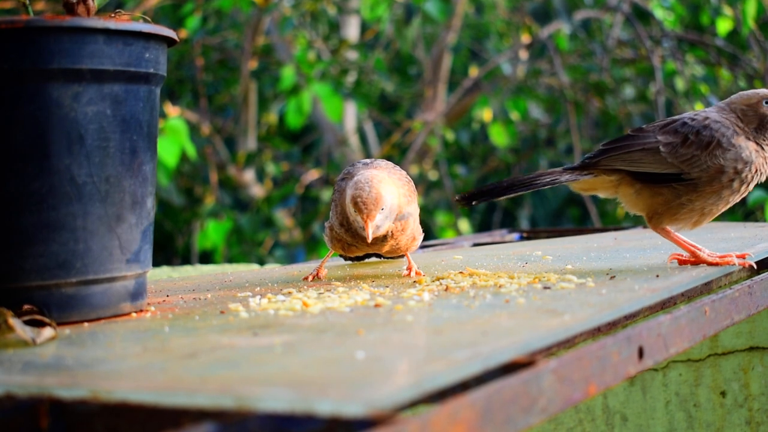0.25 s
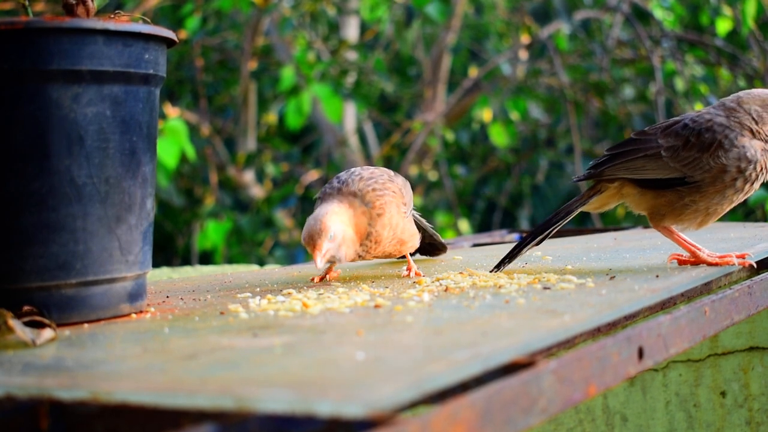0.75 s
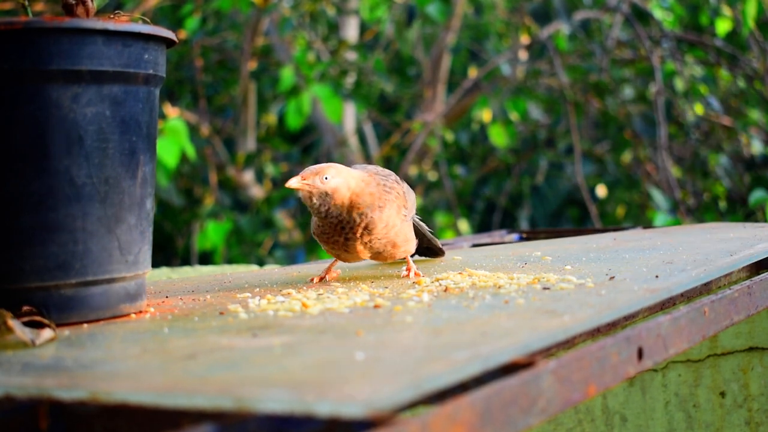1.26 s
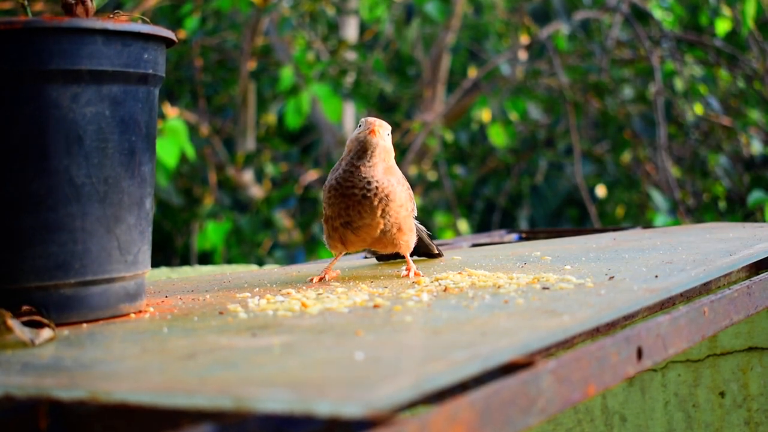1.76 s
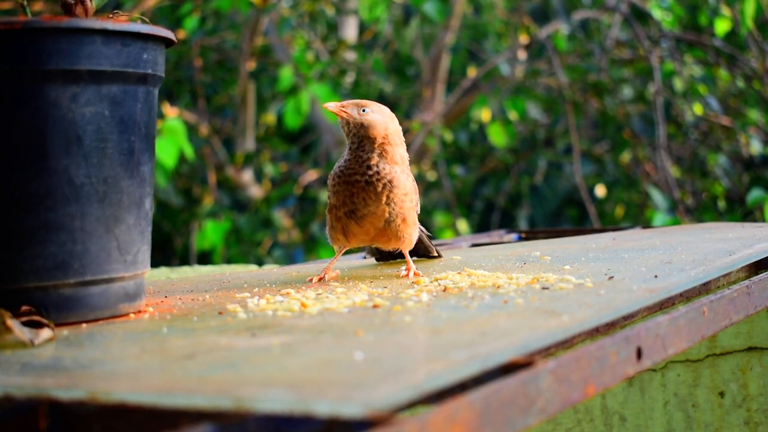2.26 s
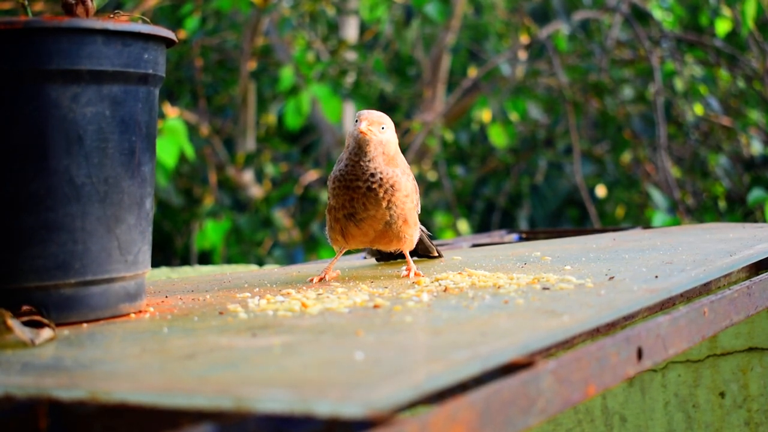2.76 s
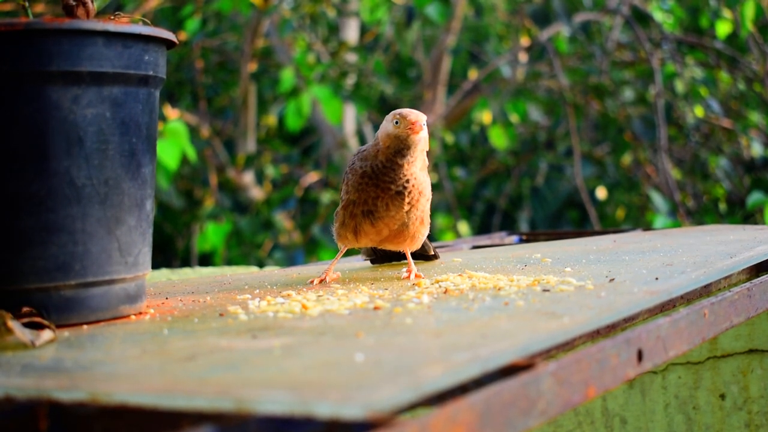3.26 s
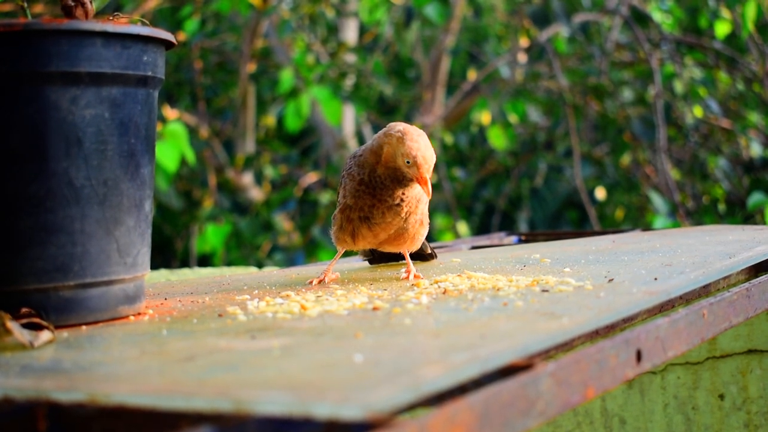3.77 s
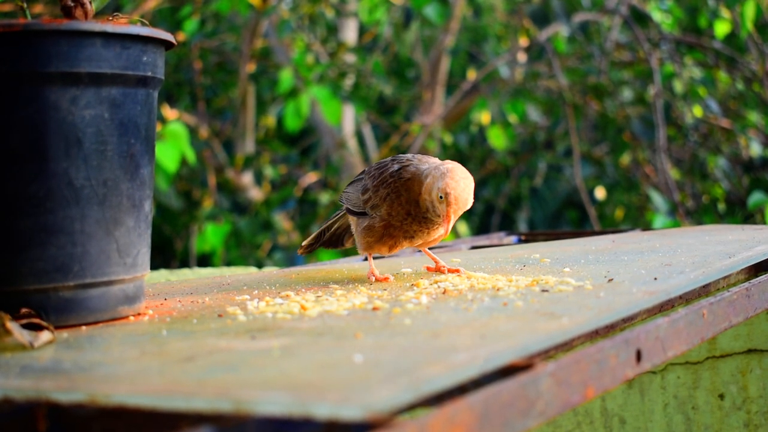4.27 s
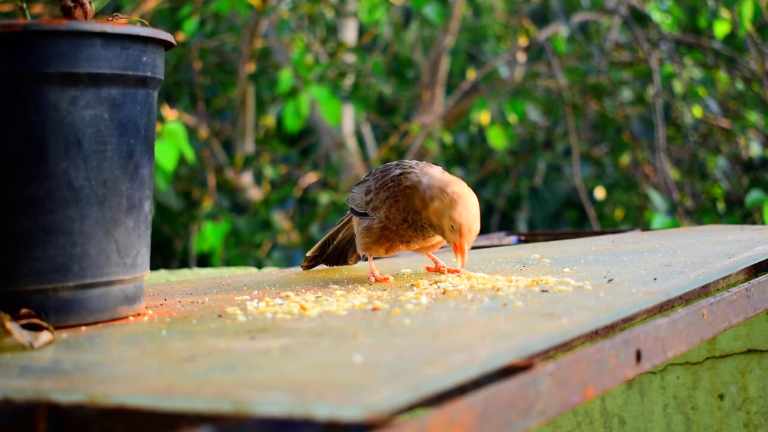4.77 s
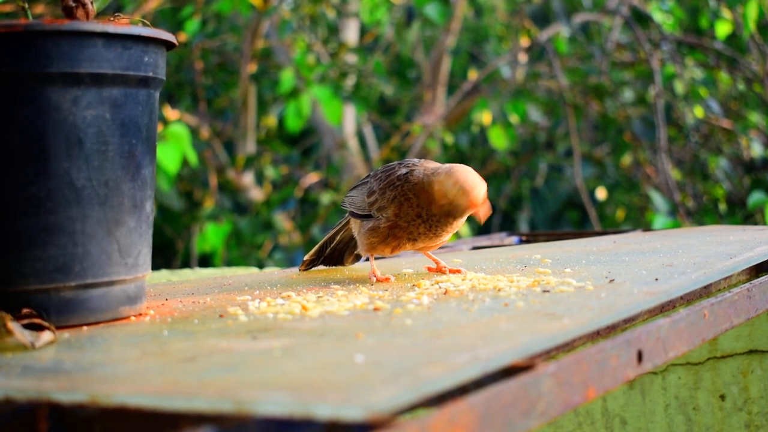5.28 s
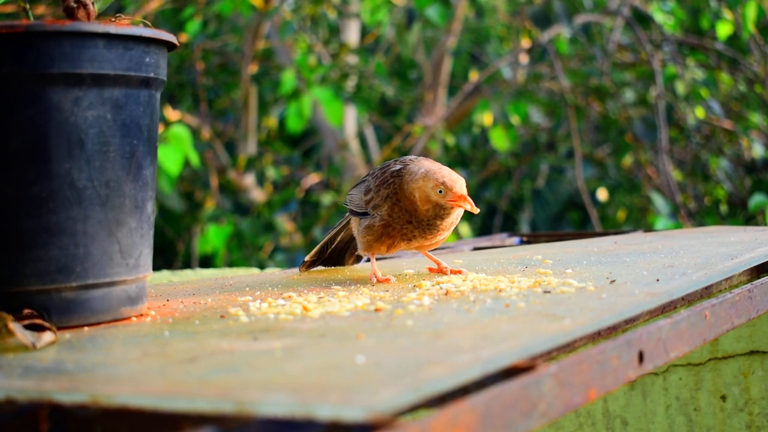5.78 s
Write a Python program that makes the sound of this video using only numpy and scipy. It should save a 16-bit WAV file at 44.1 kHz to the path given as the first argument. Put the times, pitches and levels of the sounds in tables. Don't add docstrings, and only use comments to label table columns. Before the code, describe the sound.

A small bird flock chatters in quick squeaky falling whistles among garden trees, over faint traffic, soft broom scrapes, thin insect hiss and beak ticks.

```python
import sys
import numpy as np
from scipy import signal
from scipy.fft import rfft, irfft
from scipy.io import wavfile

SR = 44100
rng = np.random.default_rng(int(sys.argv[2]) if len(sys.argv) > 2 else 0)


def boost(x):
    u = np.asarray(x, float) / 20
    return 10 ** u


def transcribe(signal):
    frames = np.atleast_2d(signal).T
    limited = np.clip(frames, -1, 1)
    pcm = np.round(limited * 32767).astype(np.int16)
    wavfile.write(sys.argv[1], SR, pcm)


N = 265903


def resonance(x, hz, width_hz):
    r = np.exp(-np.pi * width_hz / SR)
    feedback = [1, -2 * r * np.cos(2 * np.pi * hz / SR), r * r]
    return signal.lfilter([(1 - r * r) / 2, 0, (r * r - 1) / 2], feedback, x)


def butterworth(x, order, hz, kind="low"):
    return signal.sosfilt(signal.butter(order, hz, kind, fs=SR, output="sos"), x)


def drift(rate_hz):
    r = np.exp(-2 * np.pi * rate_hz / SR)
    slow = signal.lfilter([1], [1, -2 * r, r * r], rng.standard_normal(N + SR))[SR:]
    return slow / slow.std()


def add(track, start_s, sound):
    at = round(start_s * SR)
    track[at:at + len(sound)] += sound[:N - at]


def swells(events, attack_s, fade_db_per_s, floor_db):
    t = np.arange(N) / SR
    power = boost(floor_db) ** 2
    for start_s, length_s, level_db in events:
        rise = np.clip((t - start_s) / attack_s, 0, 1)
        fading_s = np.maximum(t - start_s - attack_s - length_s, 0)
        power = power + (rise * boost(level_db - fade_db_per_s * fading_s)) ** 2
    return np.sqrt(power)


def garden(x, scatter_db, direct_db=-8):
    t = np.arange(SR) / SR
    near_t60_s, far_t60_s, far_db = 0.55, 1.0, -18
    decay = boost(-60 * t / near_t60_s) + boost(far_db - 60 * t / far_t60_s)
    clumps = boost(2.5 * drift(110)[:SR])
    onset = np.minimum(t / 0.0028, 1)
    scatter = rng.standard_normal(SR) * onset * decay * clumps
    scatter = signal.lfilter([1], [1, -0.25], scatter)
    scatter /= np.sqrt(np.sum(scatter ** 2))
    return boost(direct_db) * x + boost(scatter_db) * signal.fftconvolve(x, scatter)[:N]


def whistle(pitch_hz, level_db, voice, bright_db):
    phase = 2 * np.pi * np.cumsum(pitch_hz) / SR
    sound = 0
    for multiple, db in voice:
        gain = boost(level_db + db + bright_db * np.log2(multiple))
        sound = sound + gain * np.sin(multiple * phase)
    return sound


def settle(notes, rest_hz, spread_hz):
    misses_hz = spread_hz * rng.standard_normal(30)
    return [(start_s, length_s, start_hz, rest_hz + miss_hz, level_db)
            for (start_s, length_s, start_hz, level_db), miss_hz in zip(notes, misses_hz)]


def chatter(notes, voice, bright, fall_shape, rise_shape=0.47, swell=0.63, hold=0, grow_db=0):
    out = np.zeros(N)
    unsteady = np.tile(1 + 0.005 * drift(70), 2)
    usual_bright_db, usual_level_db, loss_per_db = bright
    for start_s, length_s, start_hz, end_hz, level_db in notes:
        u = np.linspace(0, 1, int(length_s * SR))
        moved = np.minimum(u / (1 - hold), 1)
        shape = fall_shape if end_hz < start_hz else rise_shape
        glide = np.sin(np.pi / 2 * moved ** shape) ** 2
        pitch_hz = (start_hz + (end_hz - start_hz) * glide) * unsteady[int(start_s * SR):][:len(u)]
        breath = np.abs(np.sin(np.pi * u ** swell)) ** 0.6
        bright_db = usual_bright_db - loss_per_db * (level_db - usual_level_db)
        contour_db = level_db + 3 + grow_db * (u - 0.5)
        add(out, start_s, breath * whistle(pitch_hz, contour_db, voice, bright_db))
    return out * boost(2.2 * drift(200))


# (pitch_hz, level_db per Hz)
TRAFFIC_COLOUR = [(15, -58), (25, -51), (69, -13), (246, -4.5), (648, -2.5), (997, -5.5), (2630, -9.5),
                  (3730, -13.5), (5010, -17), (6210, -15), (7710, -17.5), (8820, -46), (10400, -28.5),
                  (15500, -41)]
# (start_s, length_s, level_db)
TRAFFIC_SURGES = [
    (.15, .05, -70),
    (.84, .05, -57),
    (1.15, .15, -51),
    (1.3, .03, -49.5),
    (2.02, 0.51, -53.5),
    (3.3, 0.028, -56.5),
    (4.52, .04, -61),
]


def traffic():
    hz = np.fft.rfftfreq(N, 1 / SR) + 1
    at_hz, db = np.transpose(TRAFFIC_COLOUR)
    colour = boost(np.interp(np.log(hz), np.log(at_hz), db))
    noise = irfft(rfft(rng.standard_normal(N)) * colour, N)
    low = butterworth(noise, 2, [170, 600], "band")
    steady = boost(-58.0) * (noise - low) / low.std()
    surge = swells(TRAFFIC_SURGES, attack_s=0.017, fade_db_per_s=42.5, floor_db=-54)
    return steady + surge * low / low.std()


# (pitch_hz, width_hz, level_db)
YARD_RING = [(658, 224, 3.5), (954, 290, 6.5), (1220, 1400, -4.5), (1500, 245, 0.5), (2000, 3800, -7.5)]
# (start_s, length_s, level_db)
BROOM_STROKES = [
    (.08, 0.036, -50.5),
    (.77, 0.37, -49),
    (1.1, 0.067, -49),
    (2.0, 0.3, -48),
    (3.26, 0.13, -47.5),
    (4.42, 0.38, -51),
]


def broom():
    scrape = np.zeros(N)
    for hz, width_hz, db in YARD_RING:
        patches = boost(db + 2.84 * drift(9.1))
        scrape += patches * resonance(rng.standard_normal(N), hz, width_hz)
    scrape = butterworth(scrape, 4, 2800)
    stroke = swells(BROOM_STROKES, attack_s=0.023, fade_db_per_s=31, floor_db=-57)
    return stroke * scrape / scrape.std()


def insects():
    pitch_hz, width_hz, level_db = 8700, 800, -62.5
    band = resonance(rng.standard_normal(N), pitch_hz, width_hz)
    band = resonance(band, pitch_hz, width_hz)
    return boost(level_db + 1.1 * drift(6.4)) * band / band.std()


# (start_s, length_s, pitch_hz, level_db)
HOOTS = [
    (2.026, 0.078, 950, -57),
    (2.365, 0.34, 1052, -50.5),
    (2.758, 0.15, 1050, -60),
    (3.265, 0.11, 980, -51.5),
    (3.398, 0.28, 939, -57),
    (3.775, .3, 944, -61),
]


def hoot():
    out = np.zeros(N)
    sag_hz_per_s = 38
    for start_s, length_s, hz, level_db in HOOTS:
        t = np.arange(0, length_s, 1 / SR)
        pitch_hz = hz - sag_hz_per_s * (t - length_s / 2)
        tone = whistle(pitch_hz, level_db - 0.5, [(1, 0)], bright_db=0)
        add(out, start_s, tone * signal.windows.tukey(len(t), 0.3))
    return garden(out, scatter_db=1.6)


# (start_s, peak_db, pitch_hz, width_hz, t60_s = time to die by 60 dB)
BOARD_TICKS = [(0.102, -34, 5400, 4000, 0.09), (.105, -38, 2320, 500, 0.062),
               (.145, -35, 4000, 4000, 0.039), (.148, -43, 2390, 500, .05), (.435, -34, 4540, 5000, 0.026),
               (.596, -47, 5030, 5000, .015), (.596, -32.5, 2160, 806, 0.013),
               (.762, -31, 8000, 3000, .015), (3.526, -40, 5600, 1500, 0.013),
               (4.048, -33.5, 2270, 1770, 0.2), (4.33, -37, 6040, 6060, 0.016),
               (4.855, -61, 9940, 2000, 0.018), (4.895, -37, 8500, 4000, 0.017)]


def ticks():
    out, t = np.zeros(N), np.arange(3000) / SR
    for start_s, peak_db, hz, width_hz, t60_s in BOARD_TICKS:
        knock = rng.standard_normal(3000) * boost(-60 * t / t60_s)
        burst = resonance(resonance(knock, hz, width_hz), hz, width_hz)
        add(out, start_s, boost(peak_db) * burst / np.abs(burst).max())
    out = butterworth(out, 3, 9500)
    return garden(out, scatter_db=-10, direct_db=-3.0)


# (multiple of the pitch, level_db)
CLEAR_VOICE = [(1, 5.5), (2, -11.5), (3, -31.5)]
# (start_s, length_s, start_hz, end_hz, level_db)
STRAY_CALLS = [
    (.197, 0.049, 3670, 3788, -43),
    (.40, 0.031, 4470, 4300, -63),
    (.9, 0.094, 4650, 4450, -38),
    (1.12, 0.143, 2870, 2770, -50),
    (3.712, .036, 3150, 2600, -55),
    (4.19, .03, 2030, 2100, -57),
    (4.22, .035, 2150, 2600, -54),
    (4.355, 0.15, 3580, 3240, -56.5),
    (4.98, .05, 1764, 1685, -57.5),
    (5.19, 0.045, 1520, 1504, -58),
]


def stray_calls():
    calls = chatter(STRAY_CALLS, CLEAR_VOICE, (-5, -51, 0.01), fall_shape=0.8, rise_shape=1.1)
    return garden(calls, scatter_db=-5, direct_db=-4)


# (multiple of the pitch, level_db)
HOARSE_THROAT = [(1, -1.5), (1.5, -7), (2, 1.5), (2.5, -12), (3, -16.5), (3.5, -26), (4, -26), (4.5, -55)]
# (start_s, length_s, start_hz, end_hz, level_db)
HOARSE_CALLS = [
    (.0, 0.033, 3187, 2920, -39.5),
    (.452, 0.085, 3022, 2893, -43),
    (.66, 0.13, 3104, 3090, -41),
    (2.903, 0.089, 2860, 2880, -50),
]


def low_bird_hoarse():
    calls = chatter(HOARSE_CALLS, HOARSE_THROAT, (0.45, -39.5, 0.58), fall_shape=0.93)
    return garden(calls, scatter_db=0.5)


# (start_s, length_s, start_hz, level_db)
FLAT_NOTES = [
    (1.14, 0.091, 3887, -37.5),
    (1.45, .07, 3944, -35),
    (1.725, 0.089, 3790, -38),
    (2.305, 0.1, 3830, -42.5),
    (2.57, 0.068, 3925, -35.5),
    (2.975, 0.029, 3840, -36),
    (3.275, 0.035, 3940, -35.5),
    (3.495, 0.075, 3907, -34),
    (3.825, 0.092, 3786, -38),
]


def flat_bird():
    notes = settle(FLAT_NOTES, rest_hz=3570, spread_hz=46)
    return garden(chatter(notes, CLEAR_VOICE, (4.5, -36, 0.01), fall_shape=4.3), scatter_db=-2.5)


# (time_s after its start, pitch_hz, level_db)
WARBLE_SHAPE = [
    (0, 4700, -28),
    (.006, 4350, -7),
    (.020, 2250, -11),
    (.027, 3100, 1),
    (.034, 2900, 1),
    (.044, 2620, -4),
    (.048, 1950, -14),
    (.053, 2750, -8),
    (.074, 2780, -20),
]
# (start_s, level_db)
WARBLE_STARTS = [
    (5.051, -20.5),
    (5.353, -19),
]
# (multiple of the pitch, level_db)
WARBLE_TONES = [(.7, -27), (1, -2)]
# (multiple of the pitch, level_db)
WARBLE_RASP = [(0.541, -3.5), (.8, -8), (1.22, -7), (1.45, -12)]


def warbler():
    out = np.zeros(N)
    time_s, hz, db = np.transpose(WARBLE_SHAPE)
    t = np.arange(0, time_s[-1], 1 / SR)
    pitch_hz, shape_db = np.interp(t, time_s, hz), np.interp(t, time_s, db)
    rasp_t60_s = 0.079
    voice = WARBLE_TONES + [(multiple, db - 60 * t / rasp_t60_s) for multiple, db in WARBLE_RASP]
    for start_s, level_db in WARBLE_STARTS:
        add(out, start_s, whistle(pitch_hz, level_db + shape_db, voice, bright_db=0))
    out = out * boost(2.5 * drift(400))
    return garden(out, scatter_db=-7, direct_db=0)


# (multiple of the pitch, level_db)
LOW_THROAT = [(1, -5.5), (2, 0), (3, -20.5), (4, -32.5)]
# (start_s, length_s, start_hz, level_db)
LOW_SERIES = [(1.11, 0.13, 3252, -34), (1.355, 0.12, 3210, -34), (1.58, .11, 3325, -31.5),
              (1.81, .11, 3268, -34), (2.04, 0.12, 3238, -36.5), (2.27, 0.13, 3250, -38),
              (2.51, 0.11, 3290, -36.5), (3.255, 0.092, 3270, -40.5), (5.285, 0.085, 3255, -41),
              (5.48, 0.13, 3120, -44.5), (5.66, 0.1, 3260, -39.5), (5.87, .12, 3218, -41.5)]
# (start_s,
# length_s, start_hz, end_hz, level_db)
LOW_SINGLES = [(0.599, 0.14, 3400, 3195, -40.5), (0.716, 0.085, 3187, 3266, -34.5),
               (.875, .15, 3218, 2920, -37), (1.137, 0.1, 3580, 3380, -64), (1.411, .089, 3240, 3390, -52),
               (2.245, 0.024, 3700, 3500, -56), (2.74, .13, 3243, 3034, -36.5),
               (2.943, .11, 3210, 3050, -34), (3.889, 0.055, 3265, 3377, -30.5),
               (4.788, 0.1184, 3026, 3155, -39.5), (5.02, 0.083, 2740, 3097, -40),
               (5.115, 0.036, 3293, 3268, -29)]


def low_bird():
    notes = settle(LOW_SERIES, rest_hz=2943, spread_hz=12) + LOW_SINGLES
    calls = chatter(notes, LOW_THROAT, (1.34, -41, 0.41), fall_shape=2.0, hold=0.1196, grow_db=-1.5)
    return garden(calls, scatter_db=1.43)


# (multiple of the pitch, level_db)
HIGH_THROAT = [(1, 0.5), (2, -17), (3, -37)]
# (start_s, length_s, start_hz, level_db)
HIGH_SERIES = [(.825, 0.11, 4640, -34.5), (1.035, 0.096, 4970, -33.5), (1.225, 0.064, 4620, -29),
               (1.39, 0.091, 4790, -31.5), (1.575, 0.041, 4850, -29.5), (1.745, 0.054, 4780, -30.5),
               (1.915, 0.074, 4830, -31.5), (2.08, .09, 4615, -31), (2.25, 0.063, 4696, -28.5),
               (2.42, 0.099, 5015, -30), (2.74, 0.046, 4730, -29), (2.915, 0.053, 4250, -28)]
# (start_s, length_s, start_hz, end_hz, level_db)
HIGH_SINGLES = [(2.61, 0.045, 4680, 4250, -31.5), (3.10, 0.059, 4686, 4210, -32.5),
                (3.225, 0.042, 4350, 3900, -33), (3.255, 0.036, 4780, 4264, -30),
                (3.405, 0.048, 4520, 4144, -33.5), (4.505, 0.046, 4610, 4333, -32),
                (4.548, 0.02, 4190, 4160, -24), (5.03, 0.067, 4820, 4220, -26.5),
                (5.21, .095, 4900, 4156, -24.5), (5.39, 0.086, 4970, 4107, -23),
                (5.578, 0.099, 4880, 3980, -24.5), (5.745, 0.076, 4694, 3973, -22.5),
                (5.908, 0.059, 4800, 3994, -20.5)]


def high_bird():
    bright = (2.3, -27.5, 0.31)
    notes = settle(HIGH_SERIES, rest_hz=4038, spread_hz=46.5)
    series = chatter(notes, HIGH_THROAT, bright, fall_shape=0.9, swell=1.0, hold=0.1766, grow_db=0.5)
    series = butterworth(series, 4, 11500)
    singles = chatter(HIGH_SINGLES, HIGH_THROAT, bright, fall_shape=0.8, swell=0.85, hold=0.101, grow_db=5.5)
    return garden(series + singles, scatter_db=-0.87)


def scene():
    background = traffic() + broom() + insects() + hoot()
    board = ticks()
    flock = stray_calls() + low_bird_hoarse() + flat_bird() + warbler() + low_bird() + high_bird()
    return (background + board + flock)[None]


def low_pass(x):
    return signal.sosfilt(signal.butter(12, 15660, fs=SR, output="sos"), x)


def record(dry):
    return low_pass(dry)


dry = scene()
out = record(dry)
transcribe(out)
```